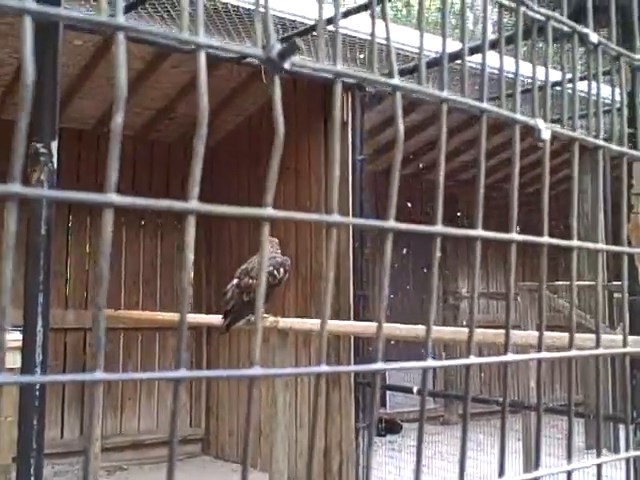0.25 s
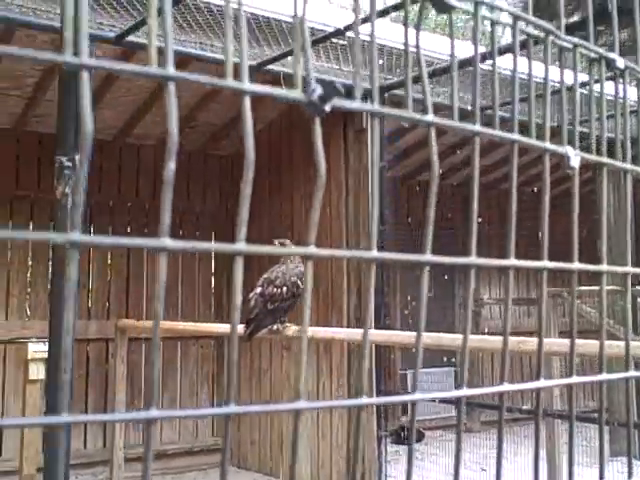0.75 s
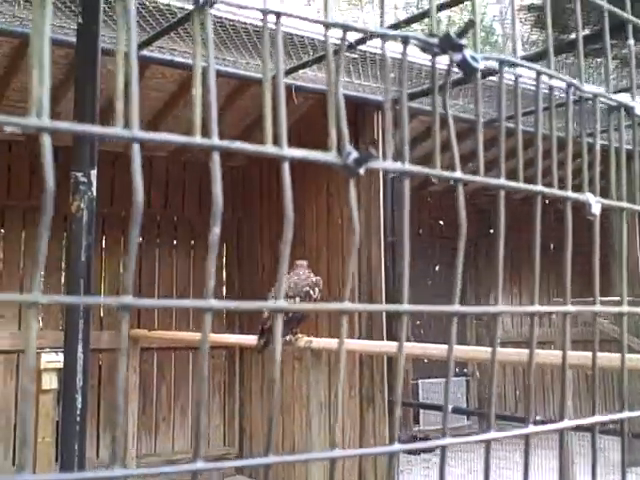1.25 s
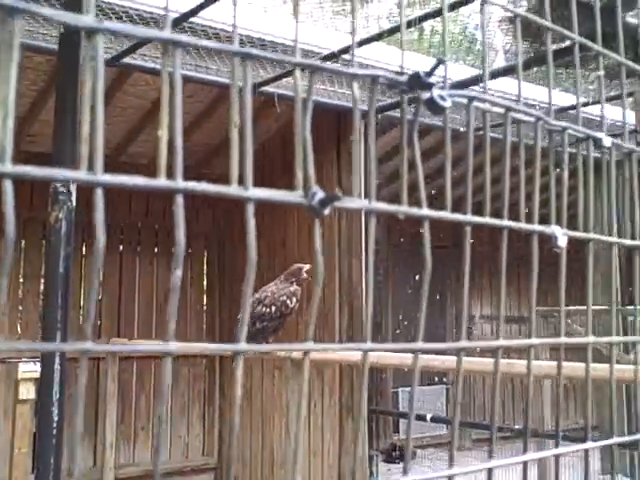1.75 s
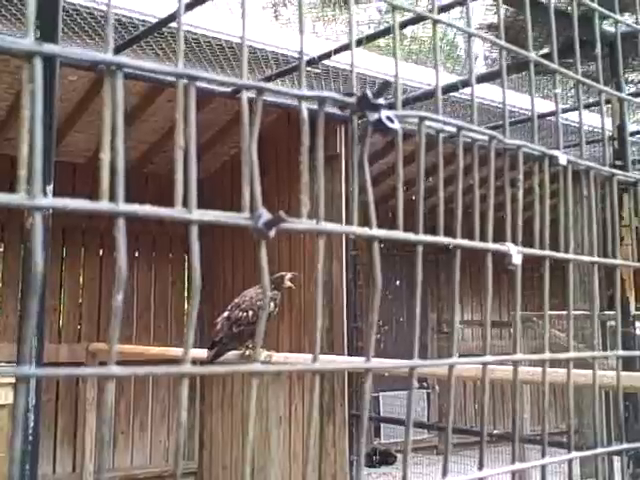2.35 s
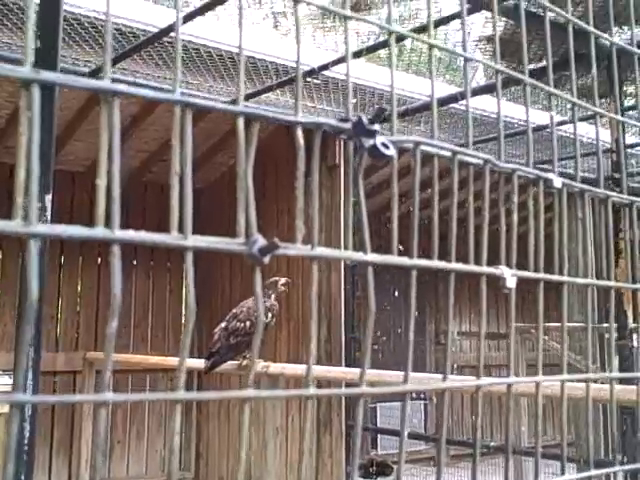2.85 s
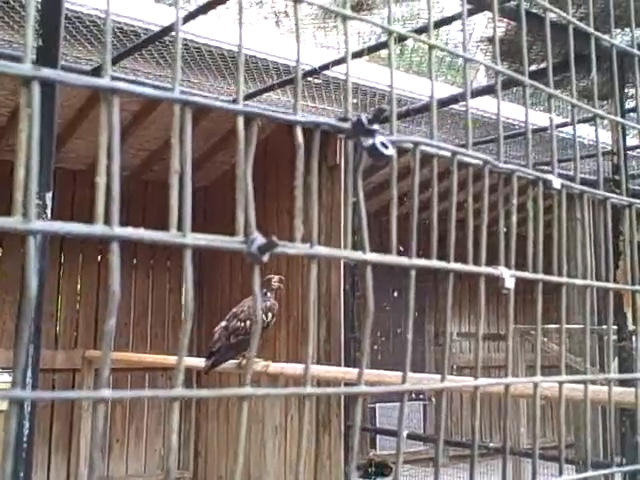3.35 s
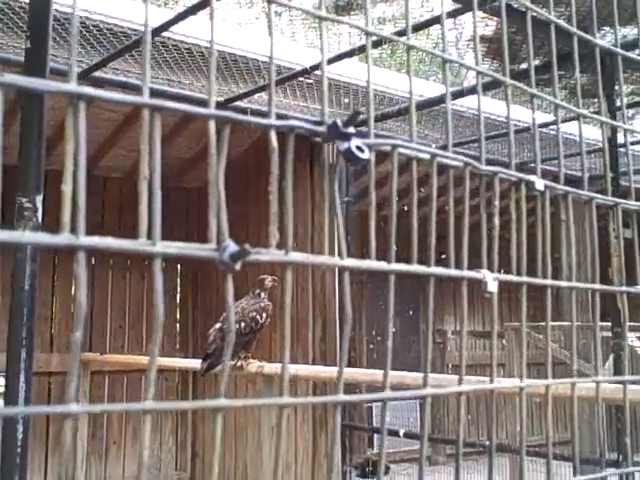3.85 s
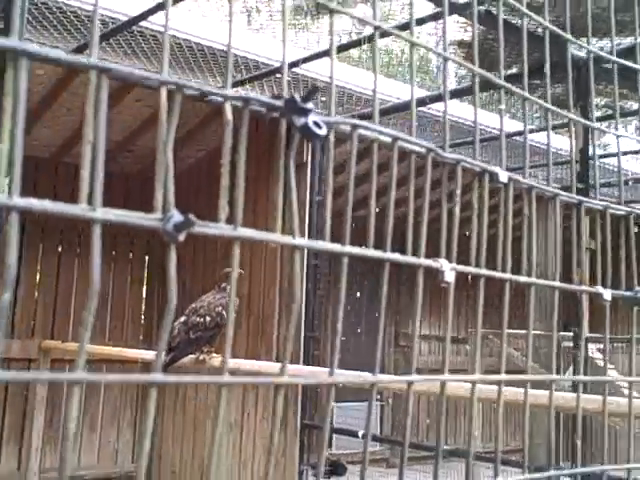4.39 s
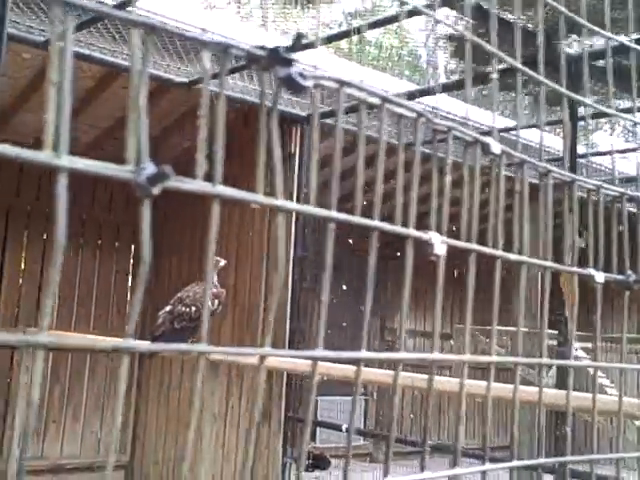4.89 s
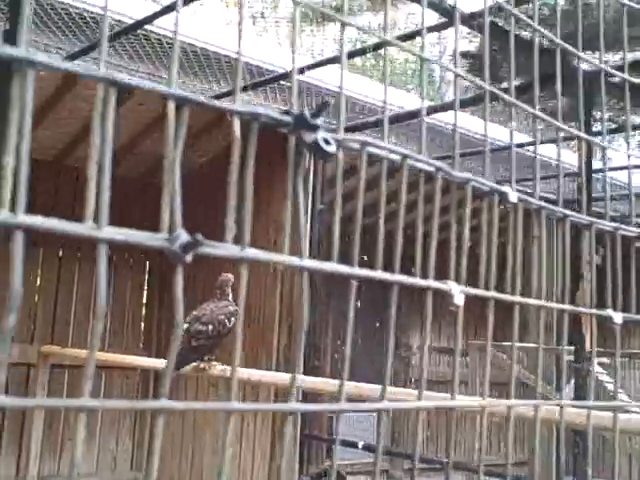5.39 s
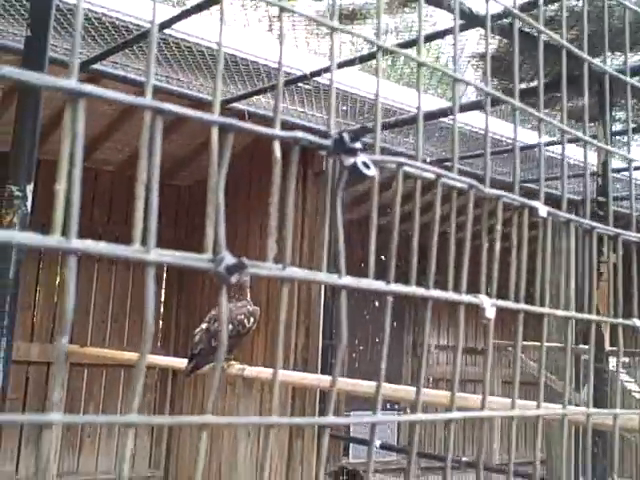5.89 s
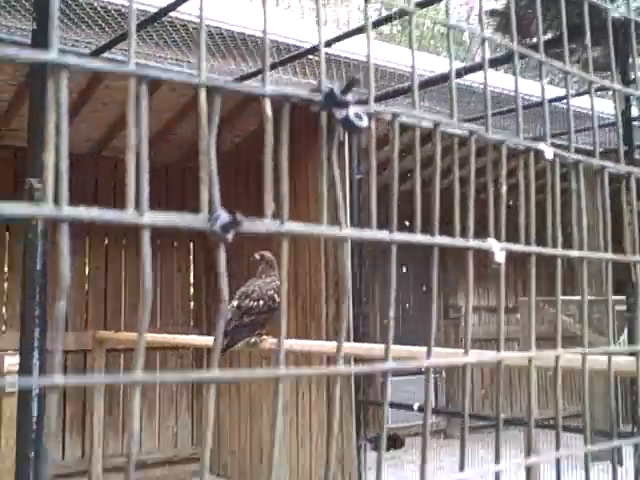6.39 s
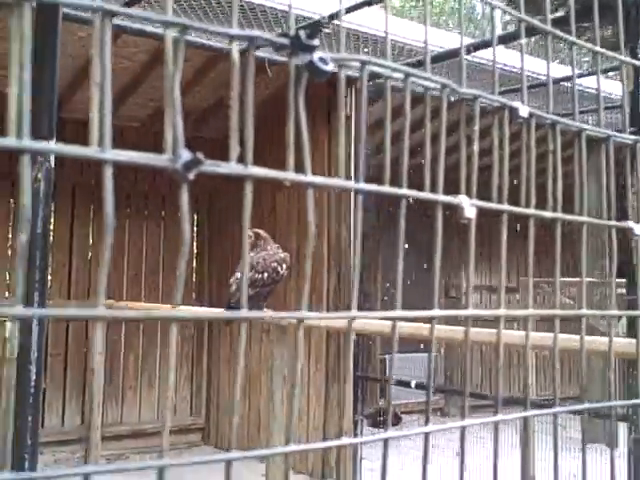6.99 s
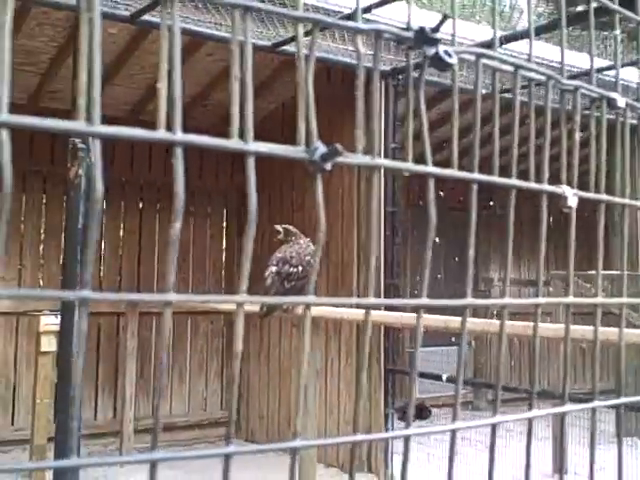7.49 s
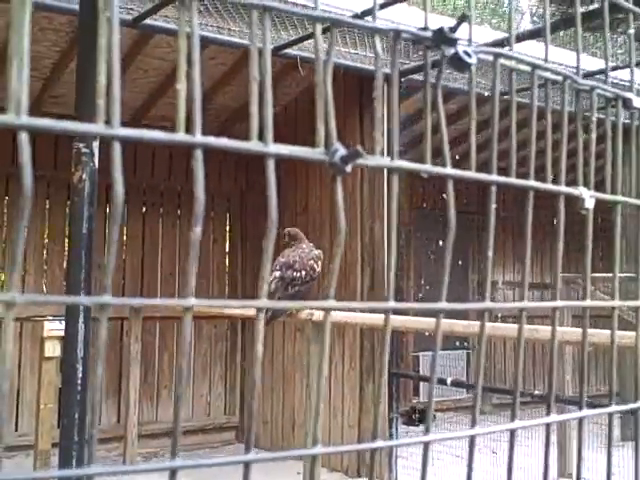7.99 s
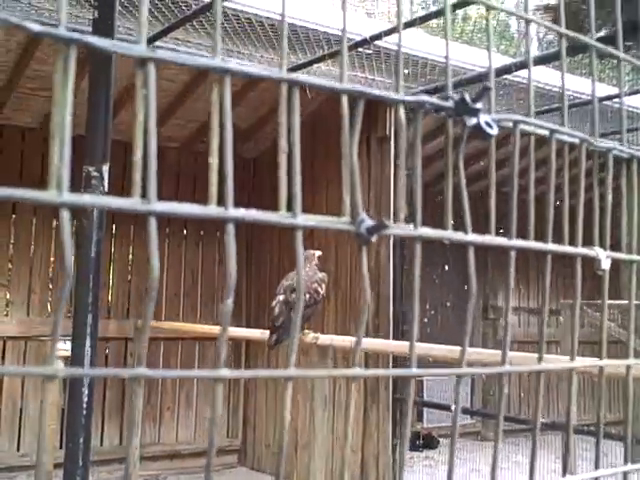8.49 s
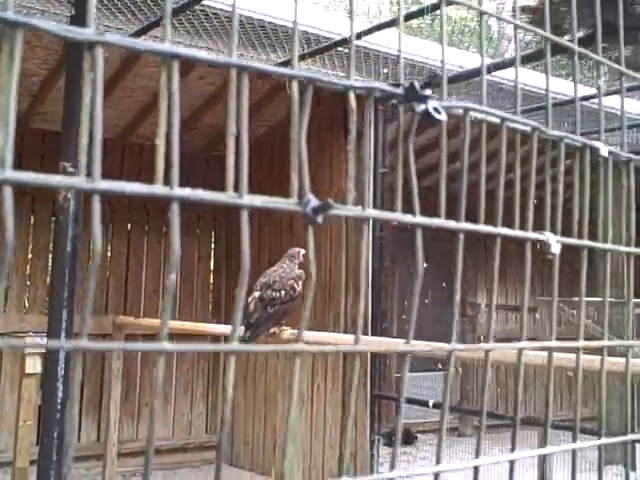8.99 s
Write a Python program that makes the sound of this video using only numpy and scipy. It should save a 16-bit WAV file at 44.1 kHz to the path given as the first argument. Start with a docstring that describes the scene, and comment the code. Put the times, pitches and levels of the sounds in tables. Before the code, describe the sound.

Short, sharp chirping cries from a perched eagle echo lightly off wooden walls, separated by near silence, faint dry rustles and soft wind buffets.

```python
"""An eagle on a perch in a wooden aviary gives short bursts of squeaks, yelps and low clucks.
Its syrinx has two sides: a main voice of rough or clean harmonic notes in two registers,
and a thin high whistle; both are arched, gliding or steady tones under a swell of air pressure.
Echoes and noise tails make the plank shelter and yard answer. Coloured noise bursts make dry rustles;
a wavering sine is a faint hum, and shaped noise is the far rumble, the breeze and the microphone's hiss."""
import sys
import numpy as np
from scipy import signal
from scipy.fft import rfft, irfft, next_fast_len
from scipy.io import wavfile
from scipy.ndimage import map_coordinates

SR = 44100
rng = np.random.default_rng(int(sys.argv[2]) if len(sys.argv) > 2 else 0)


def log_audio(samples):
    """Write samples as a 16-bit WAV file to the path given in sys.argv[1]."""
    # one column per channel
    frames = np.atleast_2d(samples).T
    # limit to full scale, then quantise
    limited = np.clip(frames, -1, 1)
    pcm = np.round(limited * 32767).astype(np.int16)
    wavfile.write(sys.argv[1], SR, pcm)


N = 407925

# half-pitch lines of a clean note, relative to its fundamental
CLEAN_HALF_DB = -34


def eagle(coupling=3):
    """Both sides of the syrinx share one air stream, so they also give sum and difference tones."""
    # yelps, arched low notes: start_s, length_s, pitch_hz, level_db, roughness (0-1)
    yelp_rows = [(.243, 0.062, 1495, -34.5, 0.41), (1.459, 0.068, 1575, -30.5, .22),
                 (1.566, .048, 1466, -41, 0.46), (2.521, .033, 1508, -29.5, 0.24),
                 (8.522, .08, 1524, -32.5, 0.18), (8.618, 0.075, 1483, -38.5, .36)]
    # scoops, low notes that slide up to open a burst: start_s, length_s, pitch_hz, level_db, roughness (0-1)
    scoop_rows = [(.128, 0.047, 1614, -43.5, .22), (7.005, .018, 1506, -38, 0.4),
                  (7.019, .026, 1628, -40.5, 0.36), (7.490, 0.048, 1638, -44, 0.27)]
    # bend: start and end pitch offsets (shares); crest: loudest point (0-1); 2nd and 3rd harmonic in dB
    yelps = low_notes(yelp_rows, bend=(-.075, -.15), crest=.43, overtones_db=(-1.5, -6.5))
    scoops = low_notes(scoop_rows, bend=(-.13, -.026), crest=.26, overtones_db=(-8.5, -42))
    voice_notes = yelps + scoops + clucks() + rasps() + squeaks()
    voice = syrinx(voice_notes, jitter=.05, shimmer_db=8.0, fall_db=11, swell=.85,
                   rasp_db=-6, air_db=-26, pop_db=-55)
    high_tones = syrinx(whistles(), jitter=.035, shimmer_db=6.5, fall_db=13.5, swell=.49,
                        rasp_db=-8, air_db=-12.5, pop_db=-56)
    mixed_tones = filtered(voice * high_tones, lambda hz: hz ** 2 / (hz ** 2 + 3000 ** 2))
    return voice + high_tones + coupling * mixed_tones


def low_notes(rows, bend, crest, overtones_db):
    """Yelps or scoops share one shape; the hoarser the note, the duller and the more its period doubles."""
    dulling_db, half_rise_db = 11, 75  # per unit of roughness
    notes = []
    for s, length, hz, db, rough in rows:
        dulled_db = np.array(overtones_db) - dulling_db * rough
        half_db = CLEAN_HALF_DB + half_rise_db * rough
        notes.append((s, length, *arch(hz, bend), db, crest, *dulled_db, half_db, rough))
    return notes


def clucks():
    """Soft falling notes: in weak ones the tone drops more than its half-pitch lines, leaving a croak."""
    # clucks that close a burst: start_s, length_s, pitch_hz, level_db
    cluck_rows = [(7.118, 0.02524, 1381, -44.5), (7.612, 0.016, 1240, -53), (7.63, 0.0193, 1393, -43),
                  (7.75, 0.017, 1167, -60), (7.769, .016, 1132, -52), (8.741, .04, 1138, -55)]
    bend, crest, overtones_db, rough = (.027, -.086), .6, (-14, -29), .27
    half_base_db, half_follows = -30, .36  # half-pitch lines gain .36 dB per dB of the note
    notes = []
    for s, length, hz, db in cluck_rows:
        half_db = half_base_db + half_follows * db - db
        notes.append((s, length, *arch(hz, bend), db, crest, *overtones_db, half_db, rough))
    return notes


def rasps():
    """The low register rattles under a whistle: very rough notes on one pitch, nearly all overtones."""
    # rasps: start_s, length_s, level_db (of the fundamental)
    rasp_rows = [(1.271, 0.038, -60), (1.371, .04, -62.5)]
    pitches_hz = arch(1446, (-.03, .025))
    crest, overtones_db, half_db, rough = .34, (13.5, 11), 6, .94
    return [(s, length, *pitches_hz, db, crest, *overtones_db, half_db, rough) for s, length, db in rasp_rows]


def squeaks():
    """The high register bends its pitch mostly toward the end; weak squeaks are duller."""
    # clean notes about an octave above the yelps:
    # start_s, length_s, pitch_hz, level_db, final_sag (share of the pitch; below zero it rises)
    squeak_rows = [(0.151, 0.04, 2786, -39, .01), (1.31, 0.04, 2889, -24.5, .06),
                   (2.194, .028, 2900, -39, -0.0198), (2.220, 0.038, 2725, -20, .115),
                   (2.299, .041, 2781, -17.5, .13), (2.404, .009, 2645, -19, -0.055),
                   (2.411, 0.024, 2720, -28, .04), (7.512, 0.033, 2720, -51, 0)]
    start_share = .2  # starts offset by this share of its sag
    crest, half_db, rough = .37, -36, .061
    full_db, dulling = -26.5, 1  # below this level the overtones lose so many dB more per dB
    notes = []
    for s, length, hz, db, sag in squeak_rows + trill():
        overtones_db = np.array((-6.5, -19)) - dulling * max(full_db - db, 0)
        pitches_hz = arch(hz, (start_share * sag, -sag))
        notes.append((s, length, *pitches_hz, db, crest, *overtones_db, half_db, rough))
    return notes


def trill(count=3):
    """One squeak broken into level-pitched pulses back to back, the middle one loudest."""
    start_s, pitch_hz, level_db, pulses_per_s, taper_db = 7.0205, 2677, -25, 58, 3
    return [(start_s + k / pulses_per_s, 1 / pulses_per_s, pitch_hz,
             level_db - taper_db * abs(k - count // 2), 0) for k in range(count)]


def whistles():
    """Straight glides of the other side, rougher when weak or steep, some after a stutter; two voice tones."""
    # whistles, and at 7.024 s two steady tones that stand for a sum tone of two voice notes and a raspy voice
    # line: # start_s, length_s, pitch_hz, level_db, # glide (upward, share of the pitch to either side),
    # second_harmonic_db
    high_tone_rows = [(.151, .03, 3500, -47.5, .04, -2), (0.174, .0061, 3870, -50, .035, 8.5),
                      (1.298, .013, 4400, -41, .07, 8.5), (1.311, .028, 3850, -30.5, .02, -11),
                      (1.372, .016, 3780, -49, .025, 15), (1.382, .026, 4200, -41.5, .1, 12.5),
                      (2.206, .011, 4250, -30, .11, -12), (2.215, .016, 4596, -37, 0.0013, -11.5),
                      (2.22, .032, 3630, -40, .01, -12), (2.292, .015, 3880, -29.5, .06, -12),
                      (2.404, .022, 3900, -43.5, .02, -12), (7.024, .035, 4270, -46.5, 0, -20),
                      (7.024, .035, 3560, -47.5, 0, -12), (7.507, .044, 3500, -40.5, .012, -4.5),
                      (7.521, 0.028, 3734, -51.5, 0, 9)]
    # stutters, two pips before a whistle: start_s, level_db, step_to_second_pip_db, second_harmonic_db
    stutter_rows = [(1.279, -53.5, 12.5, 12.5), (2.192, -33, -3, -5.5)]
    clean_db, rough_per_db, rough_per_glide = -29.5, .02, 2.8
    pip_hz, pip_s, pip_gap_s, pip_glide, pip_rough = 3895, .007, .0092, .023, .54
    crest, third_db, half_rise_db = .5, -16, 47
    tones = []
    for s, length, hz, db, glide, second_db in high_tone_rows:
        rough = rough_per_db * max(clean_db - db, 0) + rough_per_glide * abs(glide)
        tones.append((s, length, hz, db, glide, second_db, rough))
    pips = [(s + k * pip_gap_s, pip_s, pip_hz, db + k * step_db, pip_glide, second_db, pip_rough)
            for s, db, step_db, second_db in stutter_rows for k in range(2)]
    notes = []
    for s, length, hz, db, glide, second_db, rough in tones + pips:
        # the 3rd harmonic follows the 2nd by half
        overtones_db = second_db, third_db + second_db / 2
        half_db = CLEAN_HALF_DB + half_rise_db * rough
        notes.append((s, length, *arch(hz, (-glide, glide)), db, crest, *overtones_db, half_db, rough))
    return notes


def arch(hz, bend):
    """Start, middle and end pitch of a note; bend holds the end offsets as shares."""
    return hz * (1 + bend[0]), hz, hz * (1 + bend[1])


def syrinx(notes, jitter, shimmer_db, fall_db, swell, rasp_db, air_db, pop_db):
    """One side of the syrinx: each note is a curve of pitch under a swell of air pressure."""
    out = np.zeros(N)
    air_colour = [(400, -11.5), (2000, -4.5), (6000, .5), (16000, -5.5)]  # hz, relative_db
    for s, length, start_hz, middle_hz, end_hz, db, crest, second_db, third_db, half_db, rough in notes:
        size = int(length * SR)
        u = np.linspace(0, 1, size)
        half_turn = np.interp(u, [0, np.clip(crest, .1, .9), 1], [0, .5, 1])
        pressure = np.sin(np.pi * half_turn).clip(0) ** swell
        pitch = np.polyval(np.polyfit([0, .5, 1], [start_hz, middle_hz, end_hz], 2), u)
        pitch = pitch * (1 + jitter * rough * wobble(450, size))
        phase = 2 * np.pi * np.cumsum(pitch) / SR

        def partial(k):
            """Sine at k times the pitch; in a hoarse note each one flickers on its own."""
            wave = np.sin(k * phase + rough * wobble(200, size))
            shimmer = amp(shimmer_db * rough * wobble(300, size))
            return wave * shimmer * (k * pitch < SR / 2)

        # overtones bloom after the fundamental, and soft notes have fewer of them
        bloom = pressure ** .13 * (1 - np.exp(-(u / .19) ** 2))
        fall = fall_db + .35 * max(-32 - db, 0)
        levels = [second_db] + [third_db - fall * k for k in range(6)]
        overtones = sum(amp(level) * partial(k) for k, level in enumerate(levels, 2))
        # when every second cycle differs, lines appear halfway between the harmonics
        halves = sum(throat(k * pitch) / max(k - 1.5, 1) * partial(k) for k in np.arange(5) + .5)
        tone = partial(1) + bloom * overtones + amp(half_db) * halves
        rasp = amp(rasp_db) * rough * puff(size)
        air = amp(air_db) * bloom * noise(air_colour, size)
        add(out, s, amp(db) * pressure * (tone + rasp + air))
        # the membranes part with a tiny pop that fades at 60 dB in 22 ms
        add(out, s, amp(pop_db - 60 * u * length / .022) * puff(size))
    return out


def throat(hz):
    """Gain of the airway: resonances summed by power, with the lows cut."""
    # resonances of throat and beak: centre_hz, width_hz, level_db
    airway_rows = [(640, 210, -9), (1480, 100, -16), (2120, 330, 2), (2950, 540, -16.5), (3400, 400, -16.5),
                   (4400, 760, -21.5), (7700, 2300, -24)]
    power = sum((amp(db) * hz * width) ** 2 / ((centre ** 2 - hz ** 2) ** 2 + (hz * width) ** 2)
                for centre, width, db in airway_rows)
    low_cut = hz ** 3 / (hz ** 3 + 450 ** 3)
    return np.sqrt(power) * low_cut


def puff(size):
    """Turbulence coloured by the throat, rms 1."""
    return unit(filtered(rng.standard_normal(size), throat))


def rustles(rise_s=.0012, body_db=-13):
    """Short dry scuffs and ticks: coloured noise with a sharp onset and a grainy fade."""
    # the clearest rustles and ticks: start_s, level_db, fade_s (to -60 dB), brightest_hz
    rustle_rows = [(2.640, -58, .057, 1500), (4.440, -55, 0.028, 4380), (4.472, -55.5, .02, 3940),
                   (4.672, -49, 0.025, 11000), (4.951, -49, .05, 12000), (4.990, -51.5, .075, 12000),
                   (5.139, -45, .09, 12000), (5.156, -48, .14, 11000), (7.388, -61.5, .079, 2480)]
    out, t = np.zeros(N), np.arange(SR // 4) / SR
    for s, db, fade, bright_hz in rustle_rows + scuffs():
        colour = [(bright_hz / 12, -28), (bright_hz / 9, body_db), (bright_hz * .54, -11),
                  (bright_hz, 0), (bright_hz * 1.7, -1), (bright_hz * 3, -18)]
        grain = amp(3.6 * wobble(300, len(t)))
        envelope = amp(db - 60 * t / fade) * (1 - np.exp(-t / rise_s))
        add(out, s, envelope * grain * noise(colour, len(t)))
    return out


def scuffs(count=6):
    """Faint rustles at random moments, spread over their span."""
    span_s, level_db, fade_s, bright_hz = (4.6, 4.9), -60.5, .085, 13000
    times = np.interp(np.arange(count) + rng.random(count), [0, count], span_s)
    return [(s, level_db, fade_s, bright_hz) for s in times]


def aviary(x, shelter_db=-11, yard_db=-23):
    """Direct sound, the nearest surfaces, the wooden shelter and the yard beyond."""
    # echoes off nearby planks and ground: delay_s, level_db
    wall_rows = [(.0062, -17), (.0135, -12), (.0215, -27), (.036, -15.5)]
    # decay inside the planks: frequency_hz, t60_s
    shelter_t60 = [(300, .22), (1500, .25), (3000, 0.18), (8000, .22), (15000, 0.13)]
    # decay of the yard: frequency_hz, t60_s
    yard_t60 = [(300, 0.34), (1500, 0.64), (3000, 0.64), (6000, 0.55), (15000, .3)]
    shelter = amp(shelter_db) * tail(x, shelter_t60, gap_s=.008)
    yard = amp(yard_db) * tail(x, yard_t60, gap_s=.051)
    out = x + shelter + yard
    for delay, db in wall_rows:
        add(out, delay, amp(db) * x)
    return out


def tail(x, t60s, gap_s):
    """Diffuse echoes that build up after a gap; each frequency dies at its own speed."""
    hz, t, bands = signal.stft(rng.standard_normal(SR), SR, nperseg=256)
    decay = amp(-60 * t / along(t60s, hz)[:, None])
    echo = signal.istft(bands * decay, SR, nperseg=256)[1]
    echo = echo * (1 - np.exp(-(np.arange(len(echo)) / SR / gap_s) ** 2))
    return signal.fftconvolve(x, echo / np.linalg.norm(echo))[:N]


def breeze():
    """Light gusts rise, hold and die away on the microphone; single puffs push and pull its membrane."""
    # gusts: hold_start_s, hold_s, level_db
    gust_rows = [(7.092, 0.5, -52), (7.54, .48, -50), (8.6, .04, -59), (9.224, .05, -54.5)]
    # single puffs of air: centre_s, level_db, width_s
    puff_rows = [(8.503, -35, 0.0037), (7.790, -42, 0.012)]
    # colour of wind buffeting: frequency_hz, relative_db (per Hz)
    buffet_colour = [(15, -13), (42, 12), (85, -2.5), (150, -15.5), (400, -54.5), (2000, -90)]
    rise_db_per_s, fall_db_per_s = 172, 54
    t = np.arange(N) / SR
    gust_levels = [db - rise_db_per_s * (s - t).clip(0) - fall_db_per_s * (t - s - hold).clip(0)
                   for s, hold, db in gust_rows]
    gust_db = np.max(gust_levels, axis=0)
    out = amp(gust_db + 2.5 * wobble(11, N)) * noise(buffet_colour, N)
    for s, db, width in puff_rows:
        u = (t - s) / width
        out -= amp(db) * 2 * u * np.exp(-u ** 2)
    return out


def background(outdoor_db=-60, hum_db=-70, hum_hz=122.0):
    """Steady far outdoor rumble, a faint wavering machine hum and the microphone's peaked hiss."""
    # colour of the far outdoors: frequency_hz, relative_db (per Hz)
    outdoor_colour = [(12, -30.5), (20, 1.5), (48, 1.5), (113, 0.5), (143, -2.5), (327, -10), (403, -11.5),
                      (544, -12.5), (686, -16), (970, -19.5), (1470, -23.5), (5000, -34.5), (6500, -59.5),
                      (11000, -120)]
    # colour of the microphone hiss: frequency_hz, relative_db (per Hz)
    hiss_colour = [(1000, 3), (4000, -3), (8800, -2.5), (9500, 2), (9950, 9.5), (10500, 6.5), (10950, -2.5),
                   (14000, -1), (15800, -10)]
    # hiss level over time: time_s, level_db
    hiss_level = [(0, -69.5), (3.5, -68), (5, -66), (9.25, -66)]
    t = np.arange(N) / SR
    rumble = amp(outdoor_db) * amp(.5 * wobble(14, N)) * noise(outdoor_colour, N)
    hum_phase = 2 * np.pi * hum_hz * t + .8 * wobble(4, N)
    hum = amp(hum_db + 3.3 * wobble(3, N)) * np.sin(hum_phase)
    hiss = amp(np.interp(t, *np.transpose(hiss_level))) * noise(hiss_colour, N)
    return rumble + hum + hiss


def amp(db):
    """Decibels to gain."""
    return 10 ** (np.asarray(db) / 20)


def unit(x):
    """Scale to rms 1."""
    return x / np.sqrt(np.mean(x ** 2) + 1e-20)


def along(points, hz):
    """Read (Hz, value) points on a log axis."""
    f, v = np.transpose(points)
    return np.interp(np.log(hz + 1), np.log(f + 1), v)


def wobble(rate, size):
    """A smooth random curve, rate knots a second."""
    knots = rng.standard_normal(int(size * rate / SR) + 4)
    return map_coordinates(knots, [np.arange(size) * rate / SR])


def filtered(x, response):
    """x times a response of frequency, padded so that the filter can ring out."""
    m = next_fast_len(len(x) + 8192)
    return irfft(rfft(x, m) * response(np.fft.rfftfreq(m, 1 / SR)), m)[:len(x)]


def noise(spectrum, size):
    """Noise of rms 1 with the given colour."""
    return unit(filtered(rng.standard_normal(size), lambda hz: amp(along(spectrum, hz))))


def add(track, s, sound):
    """Mix a sound into the track at time s."""
    part = track[round(s * SR):][:len(sound)]
    part += sound[:len(part)]


def scene():
    """The bird and the rustles in the aviary, with breeze and outdoor air at the microphone."""
    return (aviary(eagle() + rustles()) + breeze() + background())[None]


def record(dry, top_hz=15850):
    """The camera keeps nothing above its band limit."""
    return np.array([filtered(channel, lambda hz: hz < top_hz) for channel in dry])


dry = scene()
out = record(dry)
log_audio(out)
```